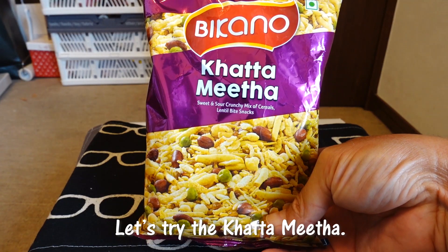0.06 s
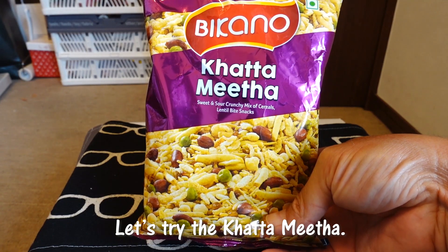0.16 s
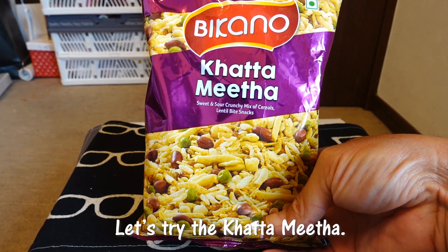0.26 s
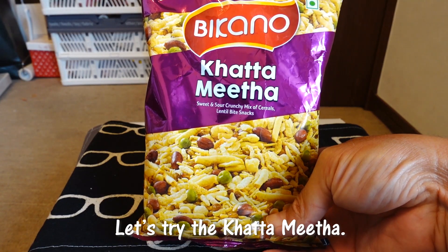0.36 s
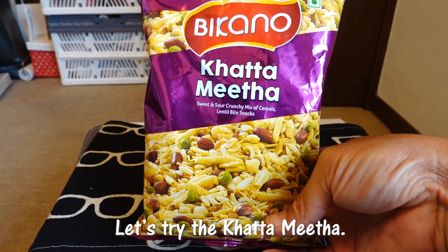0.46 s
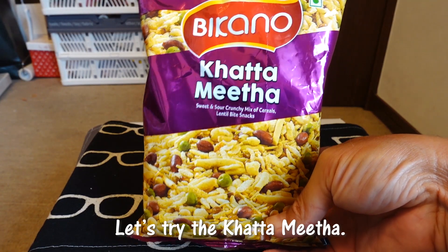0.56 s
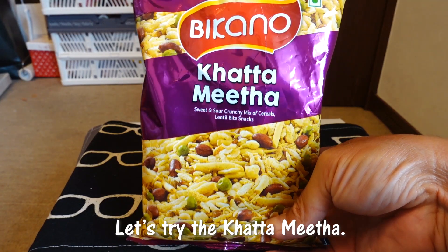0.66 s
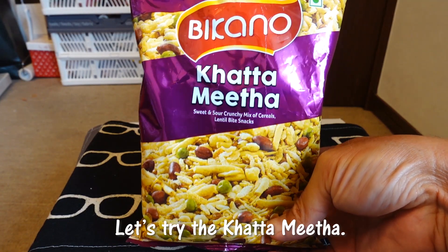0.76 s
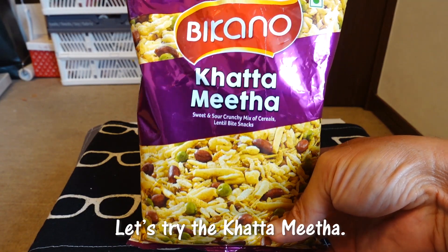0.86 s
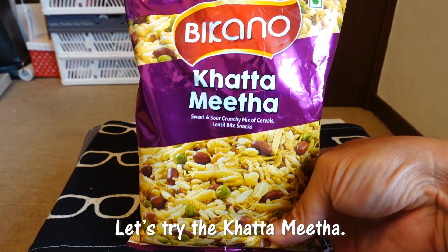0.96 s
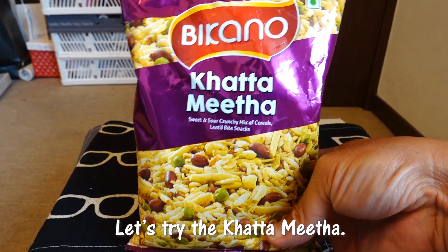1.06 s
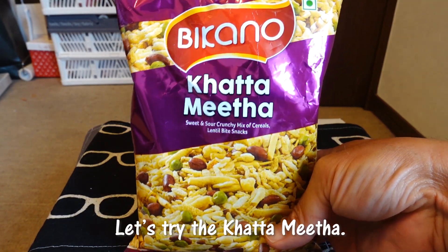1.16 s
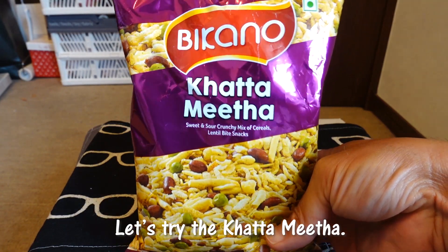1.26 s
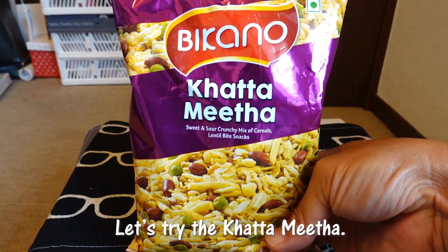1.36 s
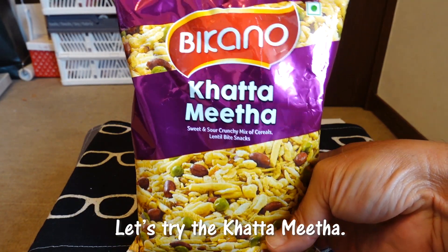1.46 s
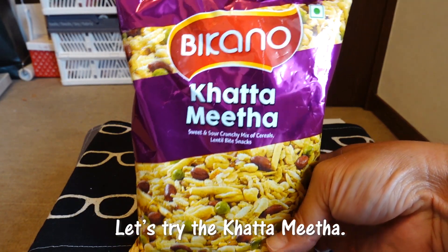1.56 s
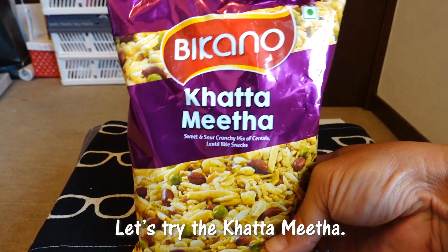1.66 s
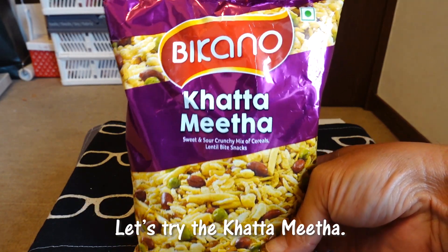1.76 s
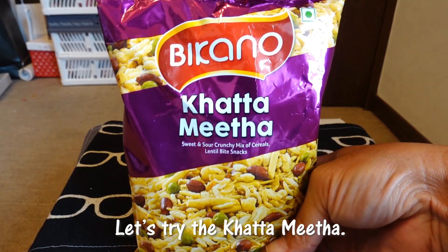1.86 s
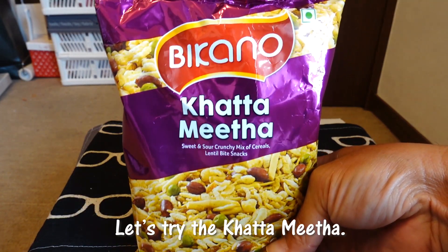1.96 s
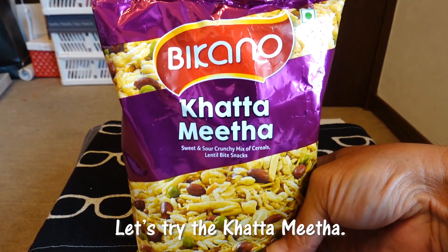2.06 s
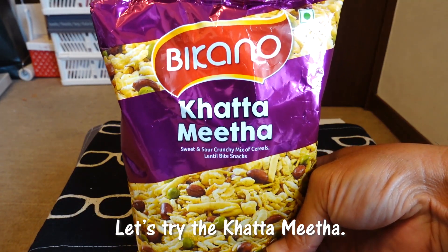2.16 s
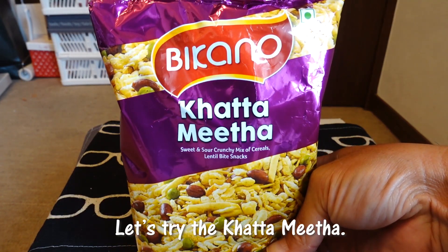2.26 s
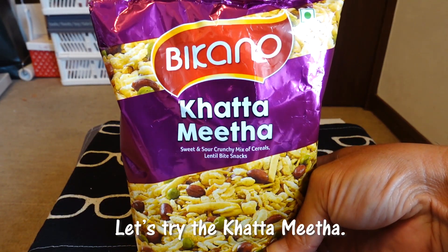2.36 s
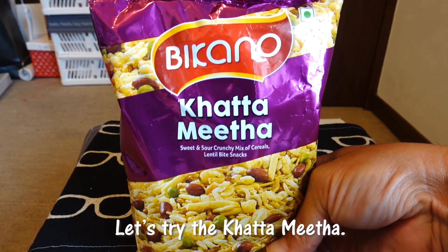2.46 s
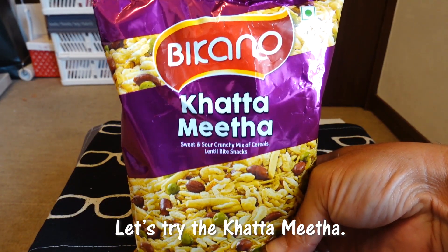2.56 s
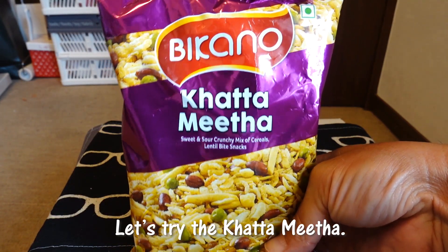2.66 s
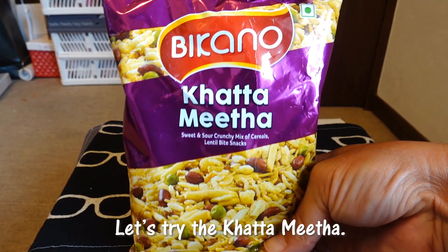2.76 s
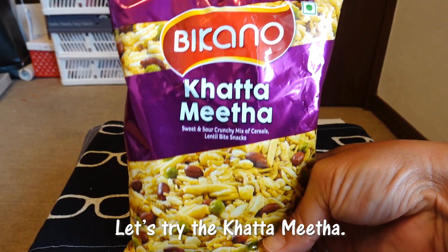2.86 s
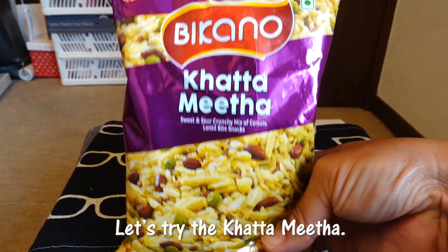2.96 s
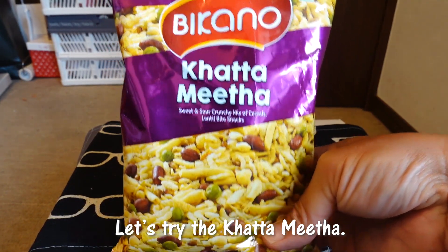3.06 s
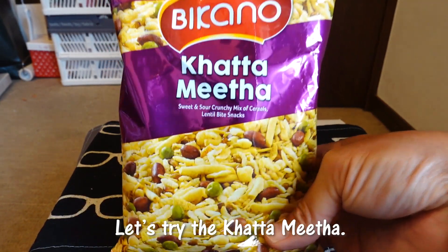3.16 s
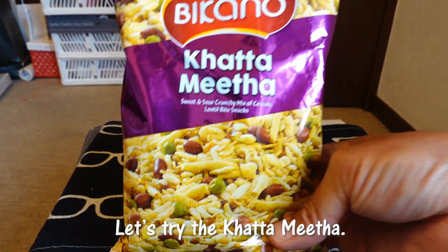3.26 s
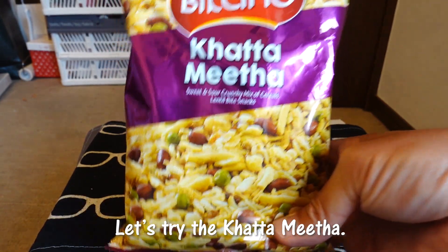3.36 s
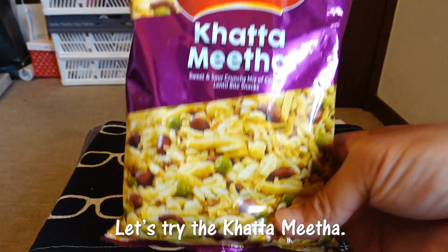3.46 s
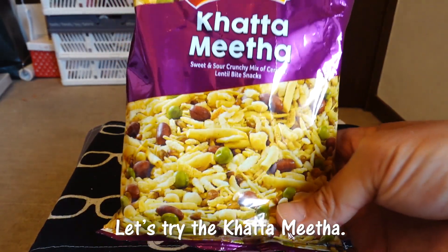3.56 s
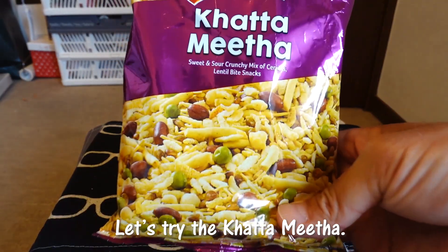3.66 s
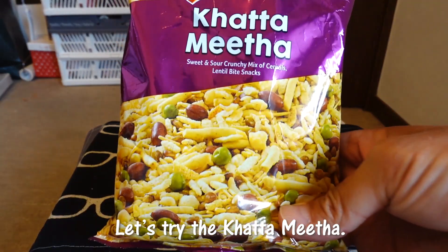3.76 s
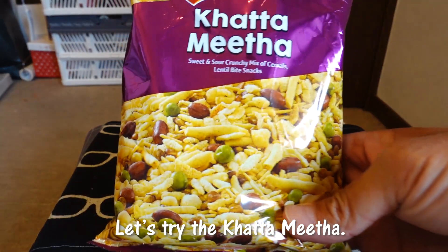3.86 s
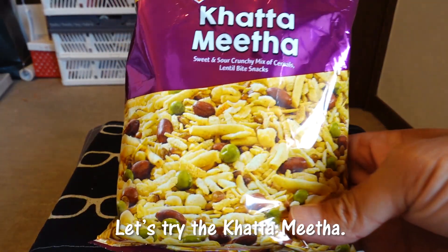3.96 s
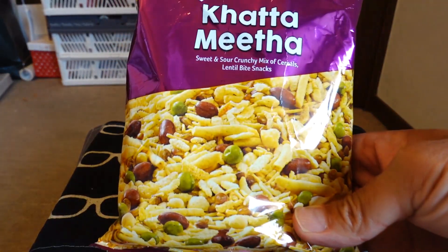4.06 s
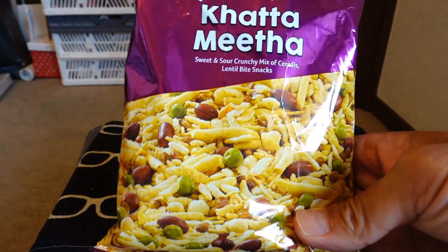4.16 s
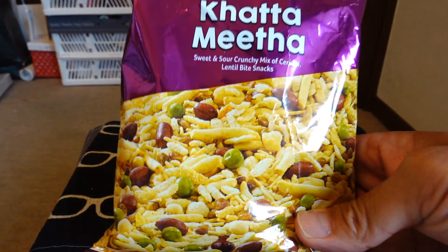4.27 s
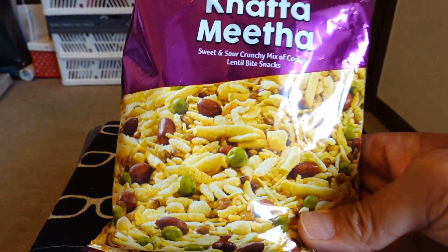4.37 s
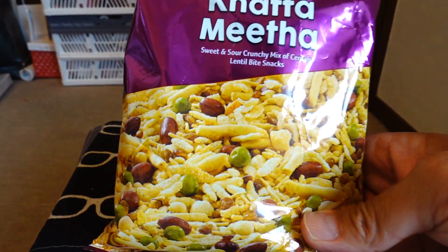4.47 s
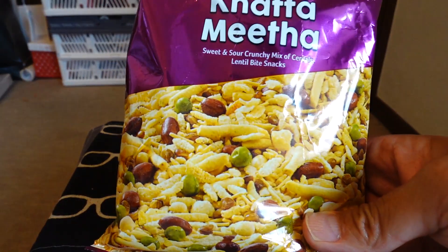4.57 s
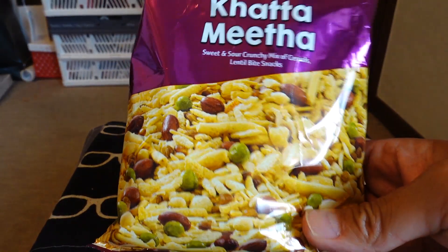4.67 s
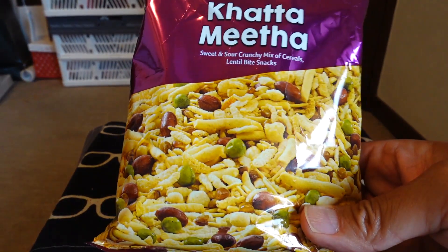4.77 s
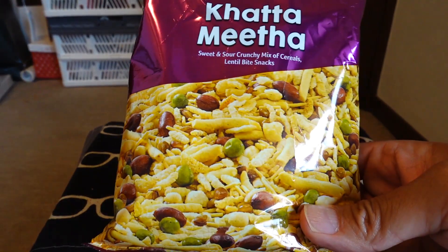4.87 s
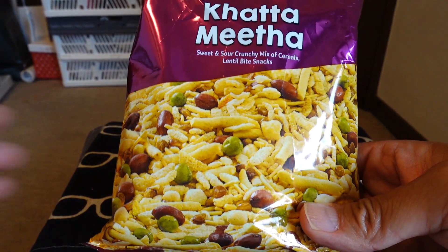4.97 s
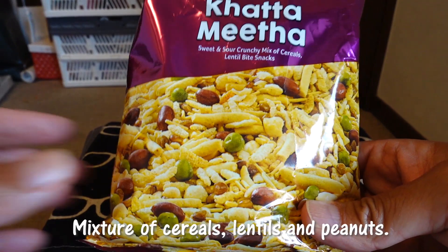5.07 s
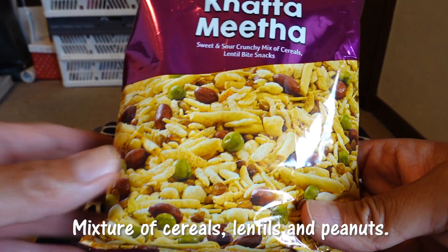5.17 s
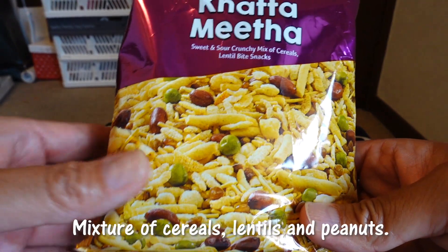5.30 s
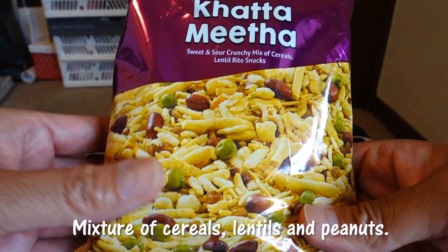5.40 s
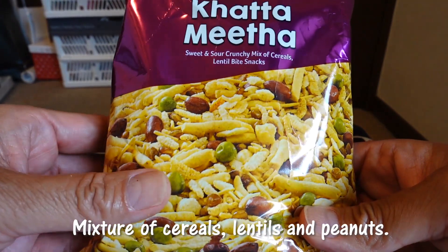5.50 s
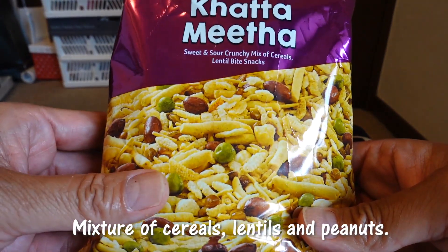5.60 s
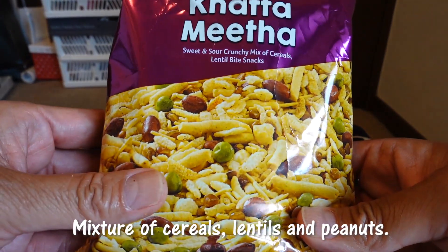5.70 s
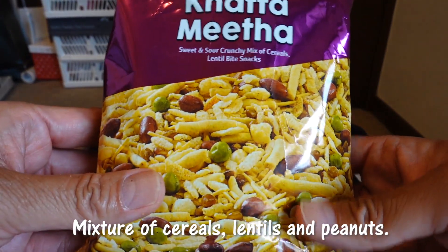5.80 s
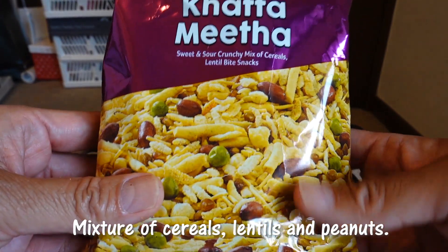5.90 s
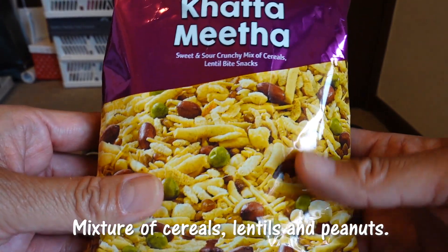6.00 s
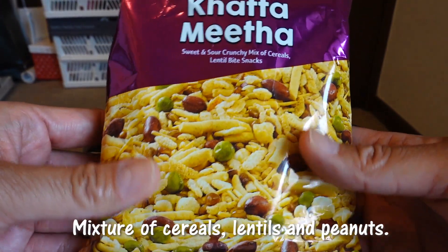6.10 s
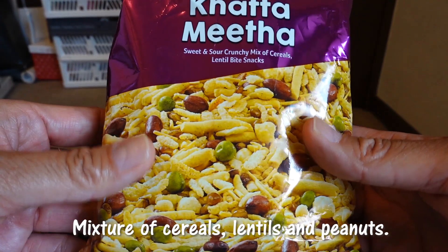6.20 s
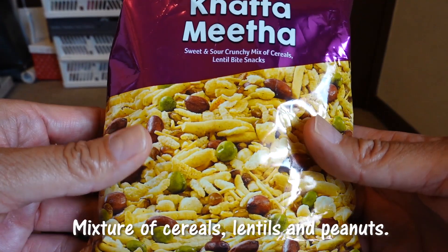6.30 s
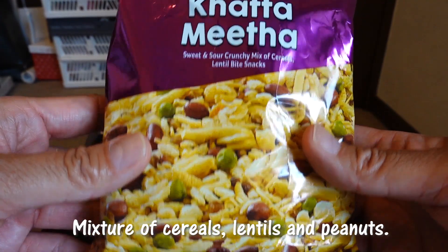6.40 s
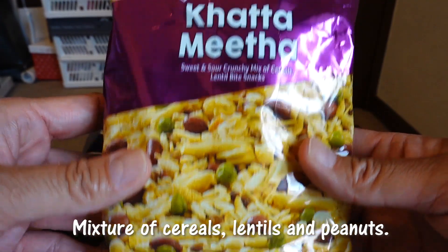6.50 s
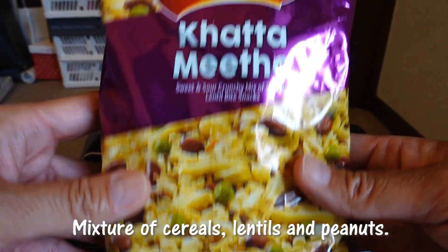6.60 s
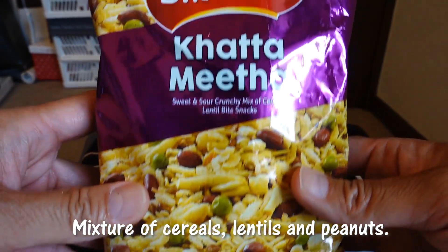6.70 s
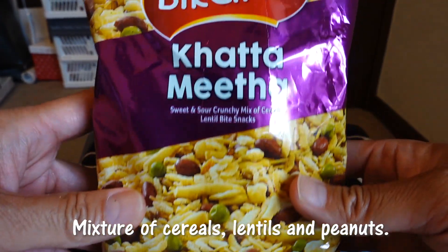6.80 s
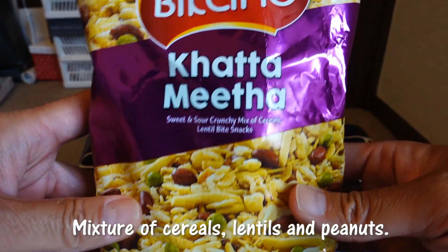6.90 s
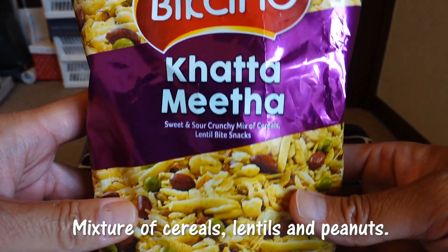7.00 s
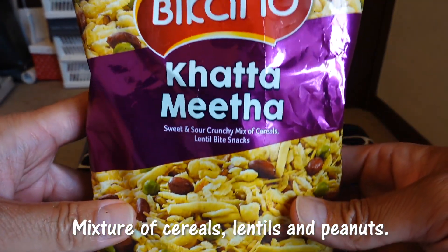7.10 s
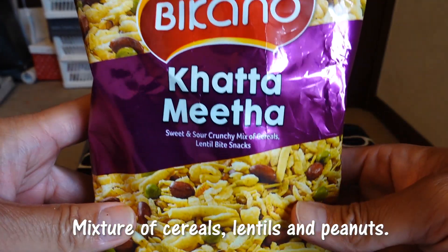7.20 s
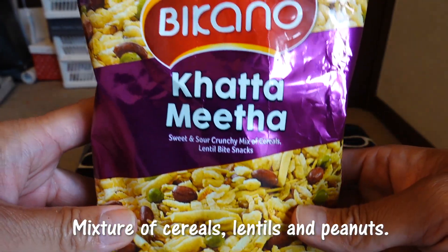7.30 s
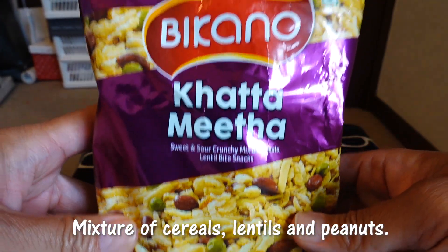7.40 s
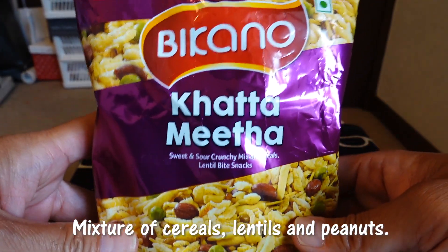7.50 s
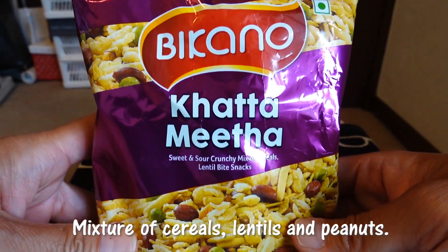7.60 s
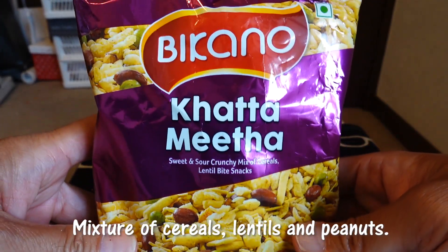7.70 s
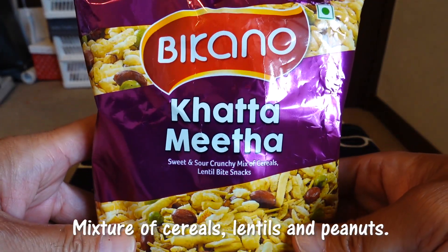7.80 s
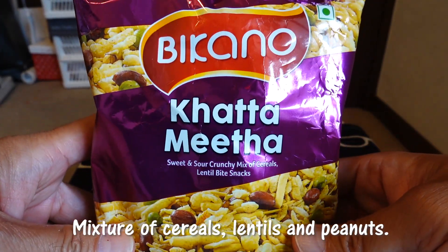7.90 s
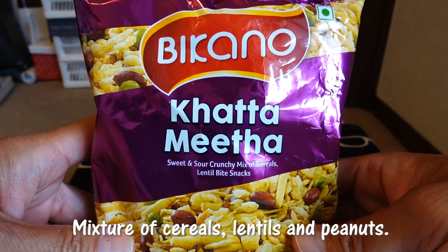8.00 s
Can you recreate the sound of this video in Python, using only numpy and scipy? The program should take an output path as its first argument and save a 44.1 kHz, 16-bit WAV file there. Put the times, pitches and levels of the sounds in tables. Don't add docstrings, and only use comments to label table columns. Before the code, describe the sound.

A small quiet room, heard in close stereo, with soft air hiss and a faint appliance drone and wavering low hum. For the first second almost nothing else happens. From about 1.0 to 1.9 s a foil-lined snack packet crinkles lightly as it is lifted, with small ticks, a few sharper pops and a soft rub of fingers. A near-silent gap follows, broken by one crisp snap at 2.4 s. From 3.0 to 4.3 s tilting brings scattered bright clicks and fine crackle, then sparse ticks and a clear snap at 4.7 s. After 5.3 s both hands squeeze: crackling thickens, loudest around 5.9 to 6.2 s, with low puffs of trapped air. Strong snaps return near 6.6, 7.0 and 7.3 s, each with a short room reflection. Sparse, weak ticks remain until about 8 s.

```python
import sys
import numpy as np
from scipy import signal
from scipy.fft import rfft, irfft, next_fast_len
from scipy.io import wavfile

SR = 44100
rng = np.random.default_rng(int(sys.argv[2]) if len(sys.argv) > 2 else 0)


def amplitude_ratio(level_db):
    exponent = np.asarray(level_db, float) / 20
    return 10 ** exponent


def log_audio(samples):
    frames = np.atleast_2d(samples).T
    limited = np.clip(frames, -1, 1)
    pcm = np.round(limited * 32767).astype(np.int16)
    wavfile.write(sys.argv[1], SR, pcm)


N = 355005

# (frequency [Hz], bandwidth [Hz], decay time t60 of the spray of slips [s])
PARTS = [
    (662, 860, 0.032),
    (1324, 1300, 0.014),
    (2833, 3240, 0.015),
    (5230, 4000, 0.0091),
    (9500, 4700, 0.0095),
]


def unit(x):
    return x / np.sqrt(np.mean(x ** 2) + 1e-20)


def along(points, hz):
    f, v = np.transpose(points)
    return np.interp(np.log(hz + 1), np.log(f + 1), v)


def filtered(x, response):
    n = x.shape[-1]
    m = next_fast_len(n + min(n, 4096))
    return irfft(rfft(x, m) * response(np.fft.rfftfreq(m, 1 / SR)), m)[..., :n]


def peak(f, hz, width_hz):
    return 1j * f * width_hz / (hz * hz - f * f + 1j * f * width_hz)


def pair(alike, hz):
    turn = np.arccos(np.clip(alike, -1, 1)) / 2
    return np.array([np.cos(turn), np.sin(turn)]) * np.ones_like(hz)


def stereo(ms):
    return np.array([ms[0] + ms[1], ms[0] - ms[1]])


def room_tone():
    # (frequency [Hz], level [dB])
    air_colour = [(12, -72), (30, -42), (63, -17), (340, -13), (1400, -12.5), (6910, -32.5), (12000, -36),
                  (16500, -37)]
    # (frequency [Hz], left-right likeness [-1 to 1])
    air_alike = [(60, 0.71), (180, 0.11), (550, -0.43), (1650, -0.27), (4970, -0.4), (15000, 0.78)]
    # (frequency [Hz], bandwidth [Hz], level [dB], left minus right [dB])
    drone = [(620, 53, -68, -6.5), (1200, 70, -71, 21.5), (1752, 41, -83.5, -19)]
    # (time [s], level [dB], half length [s])
    swells = [(0.217, -71.5, 0.17), (1.25, -82, 0.083), (1.963, -69, 0.11), (3.302, -65.5, 0.13),
              (3.93, -72, 0.14), (4.455, -71.5, 0.2), (5.036, -68.5, 0.16), (5.36, -66.5, 0.076),
              (4.632, -72, 0.051), (5.57, -74, 0.047), (6.05, -75, 0.35), (7.6, -78, 0.19)]

    noise = rng.standard_normal((2, N))
    air = filtered(noise, lambda f: amplitude_ratio(along(air_colour, f)) * pair(along(air_alike, f), f))
    sound = amplitude_ratio(-62.5) * unit(stereo(air))
    for hz, width_hz, db, pan_db in drone:
        band = filtered(rng.standard_normal((2, N)), lambda f: peak(f, hz, 2.14 * width_hz) ** 2)
        sound += amplitude_ratio(db) * unit(band) * amplitude_ratio([[pan_db / 2], [-pan_db / 2]])

    t = np.arange(N) / SR
    drift = unit(filtered(rng.standard_normal(N), lambda f: 1 / (1 + (f / 11.0) ** 2)))
    hum = np.sin(2 * np.pi * 99 * t + 0.83 * drift)
    hum_level = amplitude_ratio(-84.5)
    for s, db, half_s in swells:
        hum_level = hum_level + amplitude_ratio(db) * np.exp(-((t - s) / half_s) ** 2)
    return sound + hum_level * unit(hum)


def walls(count):
    # (frequency [Hz], decay time t60 [s])
    decay = [(200, 0.54), (800, 0.21), (2500, 0.3), (6000, 0.3), (14000, 0.5)]
    hz, t, z = signal.stft(rng.standard_normal((count, 2, SR // 3)), SR, nperseg=128)
    swell = 0.5 + 0.35 * np.clip((t - 0.014) / 0.0062, 0, 1)
    alike = along([(300, 0.65), (3000, 0.77), (14000, 0.57)], hz)
    fade = amplitude_ratio(-60 * t / along(decay, hz)[:, None])
    z = z * swell * fade * pair(alike, hz)[:, :, None]
    tail = signal.istft(z, SR, nperseg=128)[1]
    return tail / np.sqrt(np.sum(tail ** 2, axis=(1, 2), keepdims=True))


def thumps():
    # (time [s], peak level [dB])
    pushes = [(1.528, -44), (1.557, -45), (1.708, -43.5), (1.737, -41.5), (1.769, -45.5), (2.007, -56),
              (2.386, -35.5), (2.405, -37), (5.761, -45.5), (5.873, -28), (6.183, -30), (6.37, -41),
              (6.432, -39), (6.58, -37), (6.97, -40), (7.764, -45.5)]
    hz, width_hz, t60 = 353, 470, 0.066
    s, db = np.transpose(pushes)[:, :, None]
    t = np.arange(2048) / SR
    noise = rng.standard_normal((len(s), len(t))) * amplitude_ratio(-60 * t / t60)
    puffs = filtered(noise, lambda f: peak(f, hz, width_hz) ** 2)
    puffs *= amplitude_ratio(db) / np.abs(puffs).max(axis=1, keepdims=True)
    where = np.round(s * SR).astype(int) + np.arange(len(t))
    return np.bincount(where.ravel(), puffs.ravel(), N)[:N]


def grains(rate, spread_db):
    size = (rng.random(N) < rate / SR) * amplitude_ratio(spread_db * np.minimum(rng.exponential(size=N), 2.2))
    decay_s = 0.00073
    puff = signal.lfilter([1], [1, -np.exp(-1 / (decay_s * SR))], size)
    return unit(puff * rng.standard_normal(N))


def rustle():
    # (time [s], effort of the hands [dB])
    hands = [(0.0, -82), (0.99, -70), (1.57, -54.5), (2.08, -68.5), (2.95, -68.5), (3.15, -63.5),
             (3.5, -56.5), (3.65, -66), (3.9, -58.5), (4.08, -62), (4.31, -60.5), (5.29, -64.5),
             (5.58, -50.5), (5.9, -57), (6.03, -53.5), (6.68, -52.5), (7.62, -63.5), (8.05, -65)]
    # (frequency [Hz], level per Hz [dB])
    crackle = [(180, -40), (300, -21), (616, -11), (1570, -11.5), (3330, -17), (4320, -18.5), (7790, -25.5),
               (15000, -47)]
    # (frequency [Hz], level per Hz [dB])
    slide = [(120, -11.5), (300, -4), (700, -24), (1400, -2.5), (3000, -19)]

    effort_db = np.interp(np.arange(N) / SR, *np.transpose(hands)) + 60
    ticks = 0
    for hz, width_hz, _ in PARTS:
        slips = grains(rate=150, spread_db=3.0)
        rung = filtered(slips, lambda f: peak(f, hz, 1.15 * width_hz) ** 2)
        ticks = ticks + unit(rung) * np.sqrt(width_hz)
    film = unit(filtered(ticks, lambda f: amplitude_ratio(along(crackle, f)))) * amplitude_ratio(-57 + 1.41 * effort_db)
    rub = grains(rate=100, spread_db=2.5)
    skin = unit(filtered(rub, lambda f: amplitude_ratio(along(slide, f)))) * amplitude_ratio(-66.5 + 0.93 * effort_db)
    near = film + skin
    far = signal.fftconvolve(near[None], walls(count=1)[0], axes=1)[:, :N]
    return amplitude_ratio(-5.5) * near * amplitude_ratio([[-0.6], [0.6]]) + amplitude_ratio(-2) * stereo(far)


def folds():
    # (time [s], peak
    # level [dB], pitch [Hz], narrowness [dB per octave squared], throw to the walls [dB])
    big = [(1.079, -29, 4050, 2, 1), (1.38, -22.5, 4550, 2.5, 3), (2.385, -31.5, 2530, -1, 4),
           (2.39, -17, 3570, 2, -4.5), (3.343, -28, 5630, 1, -2.5), (3.4967, -17.5, 5500, 1.5, -9.5),
           (3.98, -19.5, 3370, 5, -7), (4.0905, -22.5, 3120, 16, -9), (4.7286, -16, 2630, 17, 4),
           (5.437, -21.5, 3400, 1, -2), (5.537, -16.5, 4070, 4, -7), (5.6, -22.5, 4860, 2.5, -3.5),
           (5.8763, -9, 3760, 4.5, -2.5), (5.882, -15.5, 2400, 3.5, -16), (5.952, -17.5, 2490, 0.5, -12),
           (6.0295, -17.5, 4700, 4.5, -8), (6.088, -11.5, 5000, 1, -1.5), (6.1127, -14.5, 2160, 2.5, -5),
           (6.187, -18, 4270, 10, -3), (6.56, -12.5, 4800, 2, 6), (6.579, -11, 3300, 11, 0.5),
           (6.968, -12, 3220, 2.5, -8.5), (7.0463, -11, 2800, 7, -7.5), (7.34, -14, 4500, 2, -5.5)]
    # (time [s], peak level [dB], pitch [Hz],
    # narrowness [dB per octave squared])
    small_folds = [(1.064, -37, 2100, 9), (1.194, -37.5, 3420, 5), (1.223, -43, 1660, 18),
                   (1.319, -42, 2940, 0.5), (1.345, -35.5, 725, 5), (1.365, -41, 3440, 10),
                   (1.385, -43, 2840, 15), (1.414, -33, 805, 17), (1.464, -39, 1800, 8), (1.485, -38, 2800, 30),
                   (1.495, -38, 2780, 30), (1.524, -40, 3680, 10), (1.529, -22, 2110, 44),
                   (1.533, -32, 2240, 5), (1.546, -32, 1124, 10), (1.604, -38, 3200, 2),
                   (1.625, -36.5, 3000, 3), (1.646, -29, 2130, 4.5), (1.714, -36, 2000, 4),
                   (1.711, -30, 1490, -5), (1.731, -34, 2350, 7), (1.773, -32.5, 3630, 3.5),
                   (1.776, -30, 2370, 12), (1.874, -42, 2040, 10), (1.893, -42, 1760, 23),
                   (2.014, -46, 482, -10), (2.273, -48, 600, 9), (2.382, -24, 2150, 11),
                   (3.038, -44.5, 3800, -3.5), (3.265, -43.5, 3250, 3),
                   (3.317, -38, 1940, 6), (3.383, -38, 2270, 7), (3.399, -38, 2740, 20),
               (3.457, -34.5, 3500, 3), (3.471, -32, 2240, 14), (3.486, -26.5, 2130, 10),
               (3.561, -33.5, 1650, 3.5), (3.6, -31.5, 2300, 7.5), (3.637, -37, 2610, 6),
               (3.734, -41, 3280, 25), (3.882, -43.5, 6410, -1), (3.908, -39, 6900, 0.5),
               (3.933, -29, 2340, 4.5), (3.954, -34.5, 6880, 1), (4.0944, -27.5, 6400, 2),
               (4.103, -30.5, 6100, 2), (4.157, -39, 2460, 22), (4.193, -37, 2790, 11),
               (4.208, -36.5, 3130, 11), (4.259, -38, 2990, 3.5), (4.277, -37.5, 2680, 8),
               (4.29, -37, 3080, 13), (4.438, -32.5, 3800, 13), (4.643, -38.5, 740, 21),
               (4.651, -40, 7350, 0.5), (4.673, -40, 1770, 21), (4.791, -32.5, 1490, 1.5),
               (5.003, -37.5, 2490, 11), (5.106, -47, 1590, 2.5), (5.157, -44, 2030, 5),
                   (5.256, -46.5, 1500, 8), (5.334, -45, 5060, 1), (5.364, -39.5, 1980, 2),
                 (5.381, -37.5, 2610, 2), (5.475, -32, 2430, 25), (5.485, -28, 3400, 16),
                 (5.618, -40, 3000, 0.5), (5.645, -28.5, 1560, 3), (5.758, -23, 1820, 32),
                 (5.826, -33.5, 4090, 4), (5.843, -25.5, 1850, 8), (5.853, -28, 6800, -1),
                 (5.888, -19.5, 1570, 9), (5.905, -21.5, 2460, 4), (5.954, -13.5, 2820, 2.5),
                 (6.109, -33, 1500, -19), (6.184, -18, 760, 10), (6.191, -21.5, 1340, 0.5),
                 (6.216, -45, 1650, 4), (6.238, -30, 1120, 14), (6.262, -28.5, 4600, 0.5),
                 (6.275, -31.5, 1650, 4), (6.293, -34, 710, 8), (6.307, -28, 1200, 4),
                 (6.369, -29.5, 594, 15), (6.399, -26, 2120, 6), (6.431, -27, 4490, -1.5),
                 (6.453, -28.5, 770, 13), (6.463, -30, 5830, 1), (6.483, -36, 1210, 1.5),
                   (6.506, -36, 6200, 6), (6.528, -28, 3180, 3), (6.672, -39, 4500, 0.5),
                (6.698, -19.5, 2080, 10.5), (6.884, -31, 1660, 21), (6.89, -24.5, 3350, 0.5),
                (6.902, -23.5, 1040, 22), (6.92, -40, 2500, 13), (7.211, -48, 6880, 12),
                (7.23, -57, 4860, 7), (7.257, -43, 820, 7), (7.326, -49, 1210, 3), (7.661, -42, 547, 3),
                (7.731, -44, 560, 14), (7.759, -37.5, 850, 20), (7.766, -35, 1180, 9),
                (7.828, -41.5, 1150, 8), (7.905, -43, 1780, 5), (7.915, -41, 3020, 27),
                (7.967, -37, 3220, 2),
                   (1.023, -51, 2890, 11), (1.039, -47.5, 6880, 1.5), (1.298, -46.5, 6200, 1),
             (1.336, -41.5, 6640, 2.5), (1.577, -43, 5000, 8), (1.64, -45, 4380, 9),
             (1.98, -42.5, 3600, 32), (3.436, -39, 2040, 10), (3.475, -35, 6410, 0),
             (3.627, -39.5, 2890, 1.5), (3.857, -41, 2310, 18), (4.077, -39, 6880, 1.5),
             (4.217, -40, 2530, 8), (4.272, -37, 4600, 2), (4.455, -40.5, 3620, 8), (4.724, -39, 2440, 9),
             (5.374, -40, 4380, 1.5), (5.831, -37.5, 1000, 1), (5.867, -36, 604, 1.5), (7.79, -59, 1021, 2),
             (0.902, -51.5, 2500, 5), (1.004, -56, 4600, 20), (1.169, -44.5, 3000, 2.5),
             (4.564, -56, 1200, 12), (4.626, -53, 5000, 8), (4.766, -30.5, 6030, 12), (4.826, -55, 5000, 5),
             (5.655, -40, 7000, 10), (5.747, -56, 6000, 10), (6.317, -37, 2500, 13), (6.38, -48, 8950, 12),
             (6.412, -35, 1300, 5), (1.426, -41, 2500, 5), (1.553, -52, 600, 14), (6.457, -36, 1500, -3),
             (6.312, -29.5, 900, 11), (3.581, -49, 1500, 2), (3.799, -52, 3500, 16), (3.864, -53, 8000, 8),
             (3.938, -36, 1500, 1), (3.945, -40.5, 1500, -0.5), (4.309, -46, 4500, -3),
             (5.441, -32, 6000, 10), (5.466, -29, 7000, 11), (5.501, -36, 7000, 4), (4.657, -43, 1200, 11),
                   (1.464, -37, 8000, 10), (1.651, -42, 8000, 8), (1.671, -47, 3000, 10), (1.686, -46, 3020, 12),
              (1.7, -43, 6000, -1), (1.761, -46, 8000, 10), (1.849, -48, 2500, 10), (1.815, -50, 5500, 12),
              (3.027, -56, 8000, 12), (3.076, -50, 6000, 0), (3.17, -54, 5500, 12), (3.196, -48, 6000, 12),
              (3.227, -47, 4500, 8), (3.255, -46, 4500, 4), (3.31, -48, 2500, 12), (3.286, -49, 6000, 6),
              (3.595, -42, 7000, 10), (3.925, -39, 5000, 4), (3.97, -39, 5000, 2), (4.175, -52, 9500, 12),
              (4.214, -45, 8000, 10), (5.173, -46, 7500, 14), (5.261, -46, 3020, 14),
              (5.268, -47, 6500, 14), (5.273, -46, 7000, 10), (5.345, -43, 2200, 18),
              (5.488, -40, 10500, 14), (5.692, -45, 1100, 8), (6.449, -38, 5000, 8), (6.895, -42, 8000, 6),
              (6.945, -55, 1200, 8), (7.246, -51, 2400, 10), (7.202, -52, 2500, 8), (6.547, -45, 3000, 6),
              (5.907, -28, 1240, 9)]
    # (time [s], peak level [dB], pitch [Hz], throw to the walls
    # [dB])
    facets = [(1.079, -31, 5100, 12), (1.38, -17, 2170, 0), (1.38, -20.5, 10500, 0), (4.09, -19, 9500, -18),
              (4.728, -18, 8800, 0.5), (4.791, -26, 1080, -3), (5.437, -18, 3400, 3.5),
              (5.952, -17.5, 733, -25), (6.0875, -16, 970, -4), (6.087, -10, 6050, -3),
              (6.56, -11.5, 2700, -7), (6.58, -20, 613, -9), (6.506, -38, 750, 2), (6.304, -33, 600, -6),
              (6.398, -37, 550, -8), (6.0285, -38, 500, -10), (6.89, -25.5, 1100, -9),
              (5.826, -41, 1100, -4), (5.853, -25.5, 8500, -11), (6.1, -26, 3500, -8),
              (6.431, -22.5, 3900, -6), (6.43, -24, 1080, -5), (6.698, -19.5, 2850, -5),
              (7.047, -26, 8600, 2), (4.0942, -22.5, 3300, -5), (6.528, -26.5, 2370, -6),
              (6.56, -18.5, 5000, 7), (7.34, -24.5, 7000, 6), (3.4967, -24, 5500, 4), (3.98, -27, 3070, 4),
              (7.0465, -14, 3470, -9), (7.0465, -16.5, 1460, -2), (6.969, -36, 10500, 2),
              (4.9, -42, 9900, -4), (6.082, -36, 1250, -8), (6.188, -21, 1540, -6), (5.876, -14, 4200, 0),
              (5.437, -23, 5600, 2), (5.437, -25.5, 2330, -2), (7.23, -52, 6000, -6),
              (7.211, -47, 6200, -6), (1.38, -31.5, 1270, -2), (2.39, -23, 4200, 0), (2.39, -28, 3300, 4),
              (6.9688, -15.5, 1690, 3), (6.968, -19, 3260, -6), (6.97, -33, 4800, 2),
              (7.0465, -17.5, 2080, 2.5), (7.34, -14, 2200, -10), (7.966, -25.5, 1640, -5),
              (7.967, -27, 5670, 6), (2.39, -26, 820, 1), (3.496, -24.5, 4000, 7.5),
              (7.501, -47.5, 3050, 18), (7.559, -47, 3200, 10)]
    response_db = [-2, 3, 2.5, 3, -4]

    small = np.array(small_folds)
    small_throw_db = -2.5 - 2 * rng.standard_normal((len(small), 1))
    rings = [(s, db, hz, 0, far_db) for s, db, hz, far_db in facets]
    events = np.vstack([big, np.hstack([small, small_throw_db]), rings])
    s, db, hz, narrow_db, throw_db = events.T[:, :, None]
    alone = (np.arange(len(s)) >= len(s) - len(rings))[:, None]

    parts = []
    for (part_hz, width_hz, t60), own_db in zip(PARTS, response_db):
        octaves = np.log2(part_hz / hz)
        part_db = db + own_db - np.abs(narrow_db) * octaves ** 2
        parts.append((part_hz, width_hz, t60, np.where(alone, -120, part_db)))
    parts.append((hz, 0.52 * hz, 0.019, db - 7 * ~alone))
    return s, parts, throw_db


def snaps():
    rooms, size = walls(count=48)[..., :11500], 12288
    s, parts, throw_db = folds()
    t = np.arange(1024) / SR
    luck = rng.standard_normal((len(s), 8, len(t)))
    click = np.ones_like(s) * (t == 0)
    burst, radiated = 0, 0
    for k, (hz, width_hz, t60, part_db) in enumerate(parts):
        own_ring = k == len(PARTS)
        tune = np.exp(0.07 * luck[:, 7, k:k + 1] * (not own_ring))
        colour = lambda f: peak(f, hz * tune, width_hz * tune) ** 3
        slips = 0.028 * luck[:, k] ** 3 * amplitude_ratio(-60 * t / t60)
        near = filtered(click + slips, colour)
        near *= amplitude_ratio(part_db) / np.abs(near).max(axis=1, keepdims=True)
        purity = 2 if own_ring else 1
        even = filtered(np.roll(click, 96, axis=1), lambda f: np.abs(colour(f)) ** purity)
        near_size = np.linalg.norm(near, axis=1, keepdims=True)
        radiated = radiated + even * near_size / np.linalg.norm(even, axis=1, keepdims=True)
        burst = burst + near

    treble = filtered(burst, lambda f: peak(f, 14000, 18000) * np.exp(1.5j * luck[:, 6, :1]))
    side = amplitude_ratio(-8.5) * treble - 0.11 * burst
    thrown = rfft(amplitude_ratio(throw_db) * radiated[:, :512], size)[:, None]
    answers = rfft(rooms, size)[np.arange(len(s)) % 48]
    heard = amplitude_ratio(-7.0) * irfft(thrown * answers, size)
    heard[:, 0, :len(t)] += burst
    heard[:, 1, :len(t)] += side

    out = np.zeros((2, N + SR))
    starts = np.round((s[:, 0] + 0.0002) * SR).astype(int)
    for start, sound in zip(starts, heard):
        out[:, start:start + sound.shape[1]] += sound
    return stereo(out[:, :N])


def scene():
    around = room_tone()
    packet = rustle() + thumps() + snaps()
    thinning = lambda f: 1 / (1 + 1j * f / 13000) ** 2 / (1 + (f / 15500) ** 8)
    return filtered(packet, thinning) + around


def band_limit(x):
    return signal.sosfilt(signal.butter(12, 16400, fs=SR, output="sos"), x)


def record(dry):
    rumble_cut = lambda f: 1j * f / (45 + 1j * f) * 1j * f / (40 + 1j * f)
    mix = filtered(dry, lambda f: rumble_cut(f) / (1 + (f / 15850) ** 200))
    return band_limit(mix)


dry = scene()
out = record(dry)
log_audio(out)
```